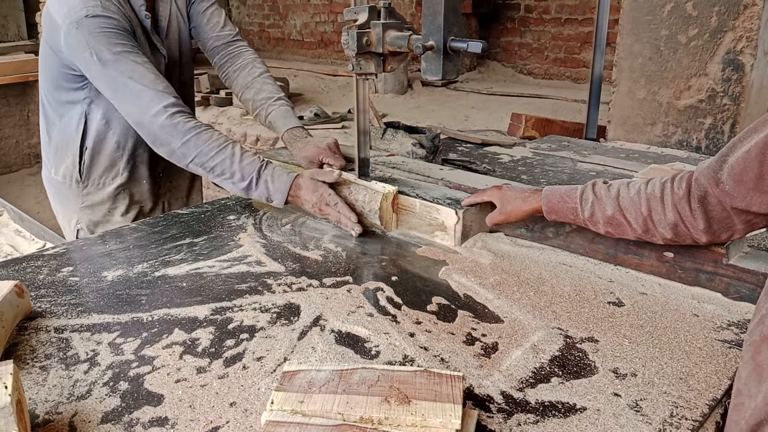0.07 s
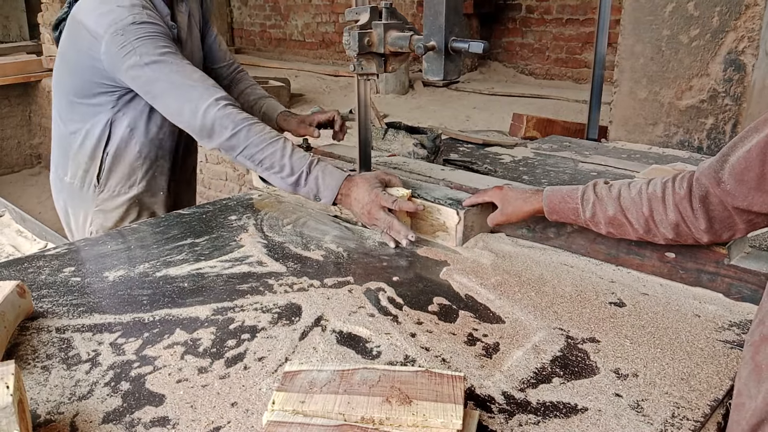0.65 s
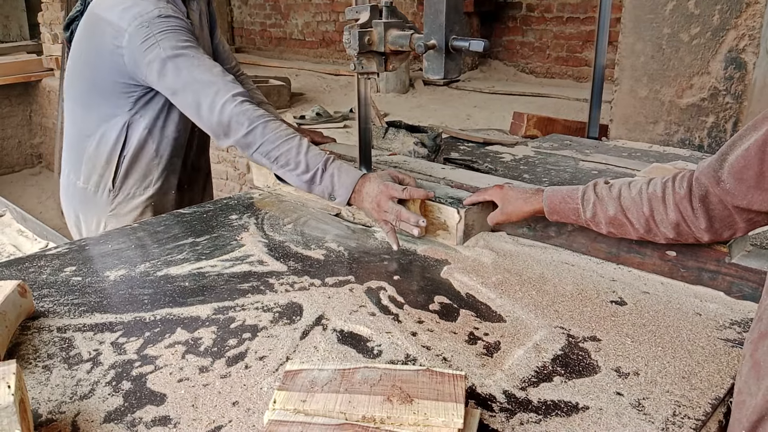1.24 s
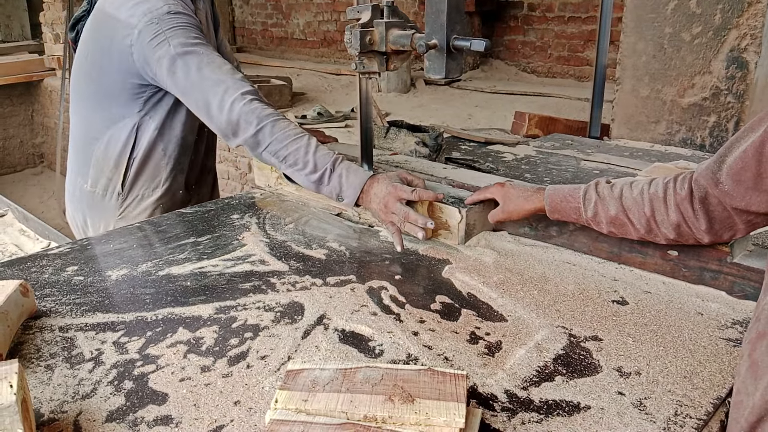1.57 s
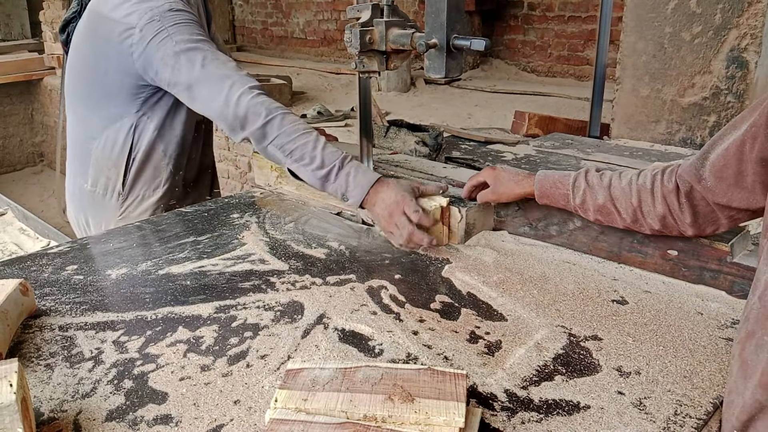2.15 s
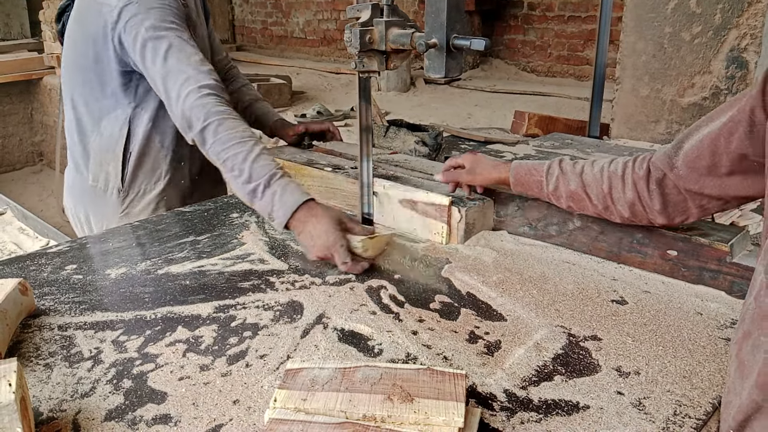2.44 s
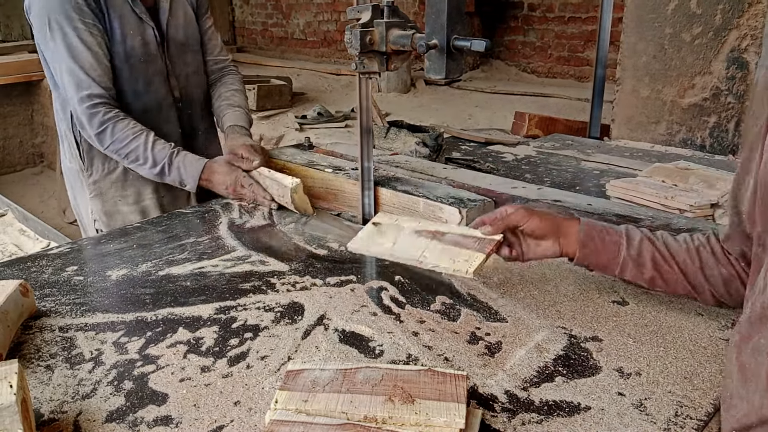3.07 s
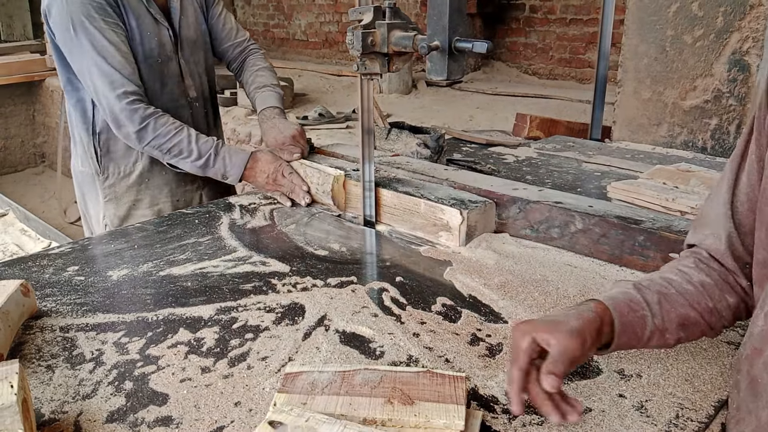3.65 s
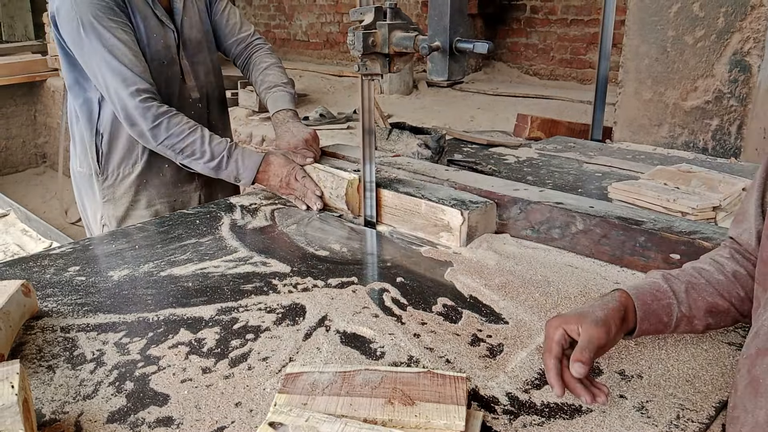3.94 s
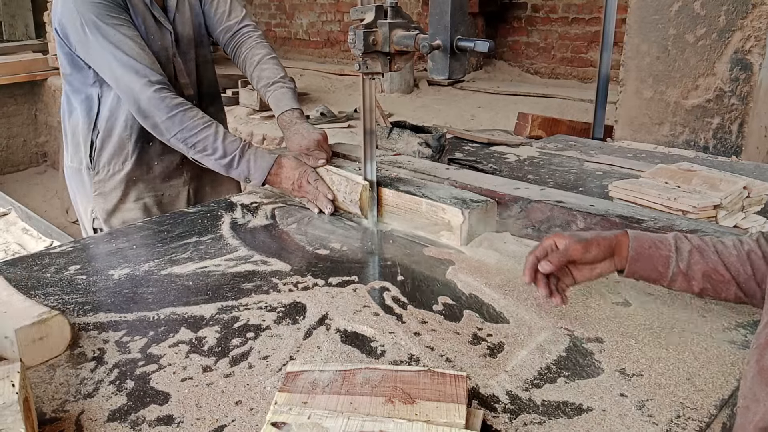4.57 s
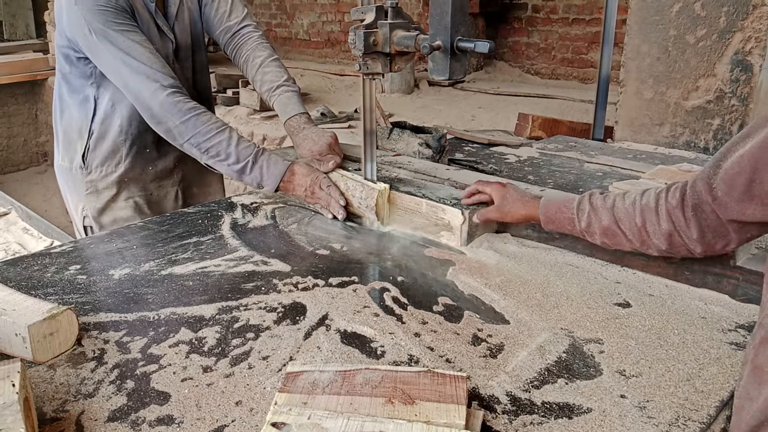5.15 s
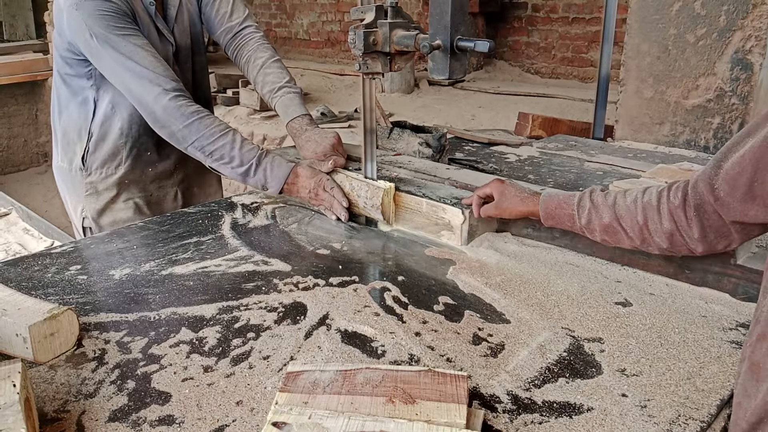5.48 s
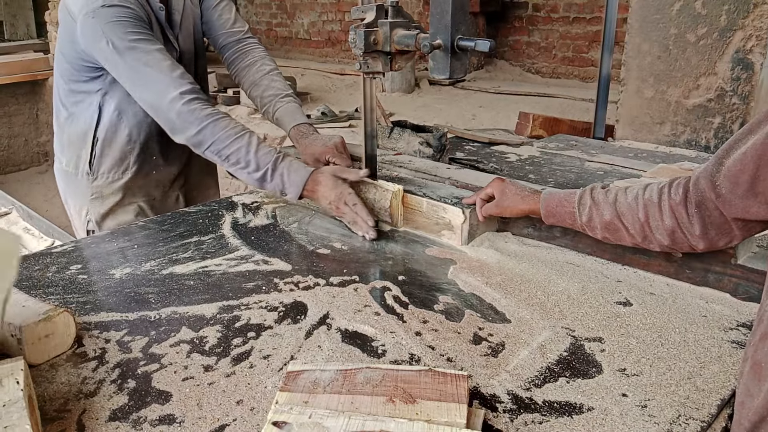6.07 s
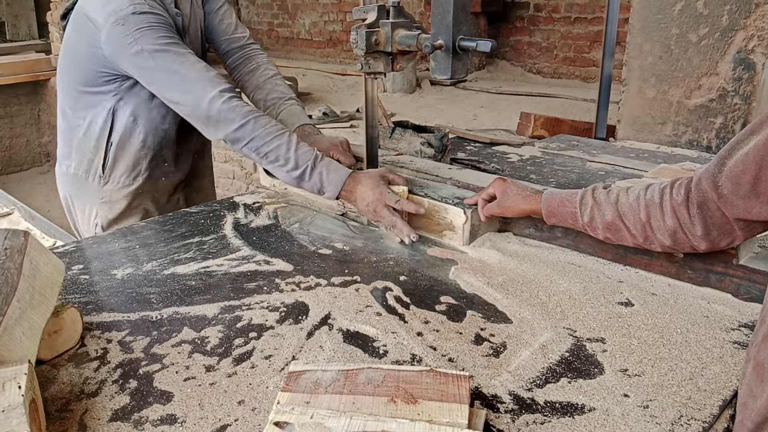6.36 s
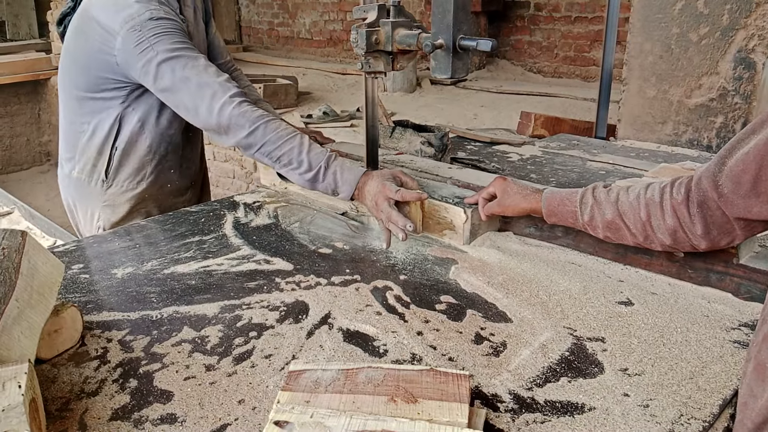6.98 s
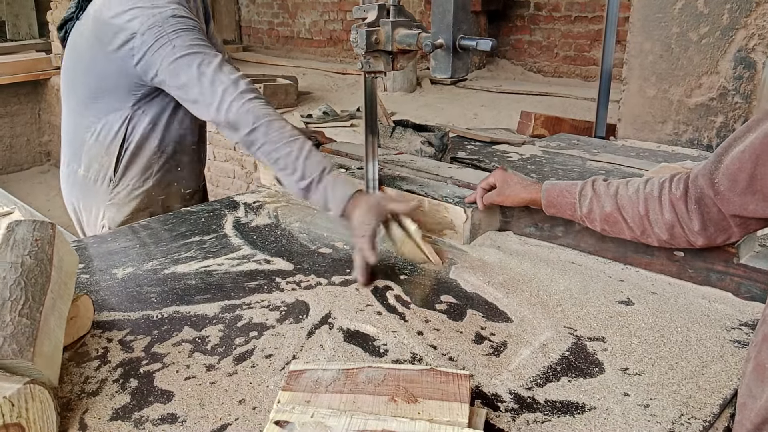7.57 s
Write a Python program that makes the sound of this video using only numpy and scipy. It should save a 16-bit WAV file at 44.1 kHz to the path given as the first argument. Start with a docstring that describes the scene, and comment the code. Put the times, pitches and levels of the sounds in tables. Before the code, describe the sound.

In a workshop, a running band saw rasps through small wood blocks, its high wavering whistle joined by cracks and knocks.

```python
"""A workshop, heard in mono, where a large band saw slices wooden blocks. The steel band rubs in its guides
with a wavering whistle and squeals where the wood pinches it; a wheel creaks once. Its teeth rasp and hiss as
the wood is pushed in, and the last fibres crack as the slat comes free. Blocks scrape and knock on the table,
and a sawn slat drops on a pile. Underneath, the frame drones, the table rumbles and a low hum climbs; brick
walls add a short reverb."""
import sys
import numpy as np
from scipy import signal
from scipy.fft import rfft, irfft, next_fast_len
from scipy.io import wavfile
from scipy.ndimage import uniform_filter1d, minimum_filter1d, map_coordinates

SR = 44100
rng = np.random.default_rng(int(sys.argv[2]) if len(sys.argv) > 2 else 0)


def master(y):
    """Save y as 16-bit WAV."""
    cut = np.clip(np.atleast_2d(y).T, -1, 1)
    pcm = np.round(cut * 32767)  # scale
    wavfile.write(sys.argv[1], SR, pcm.astype(np.int16))


N = 344862

# woody colour of a block's buzz and clack: f/Hz, level/dB
BLOCK_SPECTRUM = [(300, -31), (600, -10.5), (1150, -3.5), (1450, -6.5), (1800, 3), (2250, 1), (2700, -1.5),
                  (4000, -9.5), (9000, -41)]


def band(load, whistle_gain, grip_ring):
    """The guides rub the steel band; out-of-round wheels vary its tension, so its resonances waver."""
    # resonances of the band: f/Hz, half width/Hz, level/dB
    modes = [(2978, 47, -9.5), (3110, 54, -12.5), (3250, 130, -2.5), (3400, 70, -5), (3480, 68, -4),
             (3650, 100, -7), (3715, 71, -7.5), (3973, 147, -8), (4370, 60, -10.5), (4710, 220, -11),
             (5100, 14, -4.5), (5200, 90, -9.5), (5450, 94, -10.5), (5800, 190, -10.5), (5720, 161, -10.5),
             (6000, 51, -2), (6220, 130, -8), (6380, 190, -15), (7840, 180, -22.5)]
    wheel_hz, whistle_hz, free_whistle_db = 4.41, 3038, -29
    wheel = 2 * np.pi * wheel_hz * np.arange(N) / SR
    runout = .002 * np.sin(wheel) + .0065 * np.sin(2 * wheel)
    bend = runout + .005 * wobble(30)

    def waver(x, depth):
        return map_coordinates(x, [np.arange(N) + depth * np.cumsum(bend)], mode="wrap")

    # the lowest resonances half sing, half hiss
    phase = running_phase(whistle_hz * (1 + bend))
    tone = unit(amp(3.5 * wobble(60)) * np.sin(phase + .7 * wobble(80)))
    whistle = 0.78 * tone + 0.65 * waver(resonant(noise(), modes[:2]), depth=1)
    upper = waver(resonant(noise(), modes[2:]), depth=0.7016)
    whistle *= np.hypot(amp(free_whistle_db), whistle_gain) * amp(0.89 * wobble(18))
    upper_gain = np.hypot(loaded(load, free_db=-24, cut_db=-33, growth=0.95), grip_ring)
    return whistle + upper * upper_gain * amp(0.99 * wobble(25))


def teeth(load, buzz_gain, crackle_gain, grip_note, grip_hiss):
    """Each tooth tears off a chip: pulsing rasp, top hiss, block buzz, fibre crackle and a thin note."""
    # colours of the rasp, the top hiss and the snapping fibres: f/Hz, level/dB
    rasp_spectrum = [(600, -33), (1500, -16.5), (2700, -9.5), (3300, -4.5), (4200, -1.5), (5300, -3),
                     (6200, 4), (6900, -2.5), (7400, -10), (8000, -9), (9300, -22), (11000, -17.5),
                     (16000, -12)]
    hiss_spectrum = [(7000, -14.5), (9500, -20), (11300, -8.5), (12300, -20), (13300, 2.5), (14000, 8),
                     (15000, 0), (15700, -8.5)]
    fibre_spectrum = [(300, -32), (1500, -4), (2400, -4), (4500, -4), (6500, 8.5), (7400, -2.5),
                      (9300, -34), (14000, -20), (16000, -30)]
    # harmonics of the tooth rate: multiple, level/dB
    harmonics = [(1, -24), (4, 11.5), (8, -12), (9, 2), (10, -6), (11, -15), (12, -17), (16, -23)]
    tooth_hz, hardness_spread_db = 629.8, 1.0
    phase = running_phase(tooth_hz * (1 + 0.0012 * wobble(12)))
    # the teeth bite unevenly into the grain
    bite = unit((1 + 0.25 * np.cos(phase)) * amp(0.98 * wobble(400) + 0.47 * wobble(18)))
    grain_load = load * amp(hardness_spread_db * wobble(16))
    rasp_gain = loaded(grain_load, free_db=-27.5, cut_db=-26.5, growth=0.6)
    rasp = rasp_gain * coloured(bite * noise(), rasp_spectrum)
    hiss_gain = np.hypot(loaded(load, free_db=-41.5, cut_db=-35, growth=0.5), grip_hiss)
    hiss = hiss_gain * amp(1.2 * wobble(24)) * coloured(bite * noise(), hiss_spectrum)
    free_buzz, cut_buzz = amp(-33.5), buzz_gain * amp(hardness_spread_db * wobble(16))
    buzz = np.hypot(free_buzz, cut_buzz) * coloured(bite * noise(), BLOCK_SPECTRUM)
    snaps = uniform_filter1d(np.abs(grains(rate=150, spread_db=3.5)), size=44)
    crackle = crackle_gain * coloured(noise() * snaps, fibre_spectrum)
    note = sum(amp(db + 3.2 * wobble(45)) * np.sin(k * phase + 0.8 * wobble(55)) for k, db in harmonics)
    note_gain = np.hypot(loaded(load, free_db=-67, cut_db=-54.5, growth=1), grip_note)
    return rasp + hiss + buzz + crackle + note_gain * note


def feed():
    """Hands push wood into the teeth: the load, and gains for buzz, crackle, rumble and whistle."""
    # pushes: t/s, length/s, load/dB, load change by the end/dB,
    # then at unit load: buzz/dB, crackle/dB, rumble/dB, whistle/dB
    pushes = [(-0.1, 2.19, -1.5, -3.5, -30, -22.5, -35.5, -28.5),
              (4.14, 1.3, 2.5, -1, -38, -52, -39.5, -30), (5.69, 1.78, -2, 12, -36, -41.5, -39.5, -30),
              (7.65, 0.11, -3, -2, -33, -45, -41, -31)]
    enter_s, clear_s = 0.094, 0.045
    t = np.arange(N) / SR
    load, buzz, crackle, rumble, whistle = np.zeros((5, N))
    unsteady_db = .5 * wobble(6)
    for start, length, load_db, change_db, buzz_db, crackle_db, rumble_db, whistle_db in pushes:
        contact = np.clip((t - start) / enter_s, 0, 1) * np.clip(1 - (t - start - length) / clear_s, 0, 1)
        progress = np.clip((t - start) / length, 0, 1)
        push = contact * amp(load_db + unsteady_db + change_db * progress ** 3)  # changes mostly late
        load += push
        buzz += amp(buzz_db) * push ** 0.91
        crackle += amp(crackle_db) * push ** 2.26
        rumble += amp(rumble_db) * push
        whistle += amp(whistle_db) * push ** .7
    return load, buzz, crackle, rumble, whistle


def kerf_grip():
    """The kerf grips the band: swelling gains for the tooth note, the top hiss and the band's ring."""
    # grips: t/s, length/s, note/dB, hiss/dB, ring/dB
    grips = [(1.35, 0.72, -46.5, -51, -30), (4.15, 0.91, -42.5, -25, -25)]
    note, hiss, ringing = np.zeros((3, N))
    for start, length, note_db, hiss_db, ring_db in grips:
        shape = swell(length)
        add(note, start, amp(note_db) * np.minimum(1, 2 * shape ** 8))
        add(hiss, start, amp(hiss_db) * shape)
        add(ringing, start, amp(ring_db) * shape)
    return note, hiss, ringing


def squeals():
    """The band squeals briefly where the wood pinches it, and a wheel creaks shortly after 2 s."""
    # squeals and a creak: t/s, length/s, f/Hz, half width/Hz, level/dB
    squeaks = [(0.919, .13, 3103, 11, -24), (.85, 0.56, 1300, 110, -37), (2.08, 0.22, 2200, 170, -33),
               (7.13, 0.33, 5650, 14, -28.5), (7.258, 0.18, 5870, 330, -27)]
    out = np.zeros(N)
    for start, length, hz, width, db in squeaks:
        shape = swell(length)
        add(out, start, amp(db) * shape * resonant(noise(len(shape)), [(hz, width, 0)]))
    return out


def splinters():
    """The last fibres give with short dry cracks as the teeth break out of the block."""
    # cracks: t/s, f/Hz, level/dB
    cracks = [(1.768, 2300, -18), (1.787, 2260, -17), (2.022, 2300, -19.5), (7.408, 2550, -14),
              (7.428, 2400, -11), (7.443, 4200, -17), (7.468, 1400, -17)]
    half_width_hz, t60_s = 330, 0.028
    out, t = np.zeros(N), np.arange(SR // 8) / SR
    for start, hz, db in cracks:
        crack = resonant(noise(len(t)), [(hz, half_width_hz, 0)])
        add(out, start, amp(db - 60 * t / t60_s) * crack)
    return out


def knocks():
    """Wood strikes the table with a low thud and a clack, and bumps against the fence."""
    # blows on the table: t/s, level/dB, relative thud/dB, relative clack/dB
    blows = [(0.331, -11.5, -25, -18), (4.459, -2.5, 2, -17), (4.469, -6, -1, -20), (4.482, -6.5, 1, -14),
             (4.495, -6, -17, -15), (4.506, -23, -11, -22), (4.577, -14.5, -13, -2), (5.658, -13, -7, -12),
             (5.672, -11, -13, -5), (5.724, -16.5, 0, -2), (5.951, -25, 8.5, -19), (7.467, -24, -8, 6),
             (7.756, -15.5, -11, -12)]
    # bumps on the fence: t/s, level/dB
    bumps = [(5.991, -11), (6.206, -11)]
    # ring of a blow and of a bumped block: f/Hz, level/dB, t60/s
    blow_modes = [(148.4, -3.5, 0.16), (233.6, 0, 0.11), (260, -10, 0.086), (399, -3.5, 0.066),
                  (540, 0, 0.072), (740, 1.5, 0.056), (940, 2.5, 0.046), (1082, -1.5, 0.05),
                  (1346, 1, 0.026)]
    bump_modes = [(217, 3.5, 0.038), (453, -16, 0.029), (835, -6, 0.034)]
    out = np.zeros(N)
    for start, db, thud_db, clack_db in blows:
        attack = clack(clack_db - 3.5, t60_s=0.026)
        body = amp(-10) * ring(blow_modes, thud_db + 4)
        add(out, start, amp(db) * (attack + body))
    for start, db in bumps:
        add(out, start, amp(db) * ring(bump_modes))
    return out


def slat_drop():
    """The sawn slat lands and bounces on the pile with a dry, ringing clack."""
    # landings: t/s, level/dB
    landings = [(3.636, -15.5), (3.641, -13.5), (3.651, -29)]
    # ring of the slat: f/Hz, level/dB, t60/s
    modes = [(830, -12, .045), (1000, -12, .04), (1430, -3, 0.023), (2070, 1, 0.03), (2450, -1, .022)]
    out = np.zeros(N)
    for start, db in landings:
        add(out, start, amp(db) * (clack(-3.5, t60_s=0.036) + ring(modes)))
    return out


def clack(db, t60_s):
    """The attack of struck wood: a fast-fading burst of woody noise."""
    t = np.arange(SR // 4) / SR
    return coloured(noise(len(t)), BLOCK_SPECTRUM) * amp(db - 60 * t / t60_s)


def ring(modes, thud_db=0):
    """Fading modes of struck wood, a little different each blow; thud_db weights those under 300 Hz."""
    t = np.arange(SR // 4) / SR
    tones = np.zeros(len(t))
    for hz, db, t60 in modes:
        decay = amp(db + thud_db * (hz < 300) + rng.normal(0, 1) - 60 * t / t60)
        tones += decay * np.sin(2 * np.pi * hz * (1 + rng.normal(0, 0.024)) * t)
    return tones * (1 - np.exp(-t / 0.0029))


def slides():
    """Blocks judder on the table and scrape over its sawdust."""
    # strokes: t/s, length/s, judder/dB, scrape/dB
    strokes = [(0.173, 0.23, -35.5, -31), (0.482, 0.26, -33.5, -34.5), (0.77, 0.29, -37.5, -36),
               (1.377, 0.31, -36.5, -39), (2.68, 0.454, -42, -46), (3.17, .36, -45, -50),
               (4.225, .17, -39, -50), (5.656, 0.17, -31.5, -35), (5.9, 0.17, -38, -35),
               (6.233, .13, -37, -61), (6.62, .5, -40, -41.5), (7.304, 0.24, -37, -40.5)]
    # colours of the judder and the scrape: f/Hz, level/dB
    judder_spectrum = [(50, -36), (95, -7), (135, 7.5), (180, 3), (230, 11), (320, -35), (900, -39),
                       (3000, -60)]
    scrape_spectrum = [(150, -49), (330, -1.5), (450, 4.5), (620, 0.5), (730, -8), (870, 1), (1150, -15),
                       (1600, -17), (5000, -42)]
    judder, scrape = np.zeros((2, N))
    for start, length, judder_db, scrape_db in strokes:
        shape = signal.windows.tukey(int(length * SR), .5)
        add(judder, start, amp(judder_db) * shape)
        add(scrape, start, amp(scrape_db) * shape)
    slips = grains(rate=700, spread_db=4)
    return judder * coloured(slips, judder_spectrum) + scrape * coloured(slips, scrape_spectrum)


def machine(rumble_gain):
    """The frame drones and the table rumbles, harder when the cut shakes it."""
    # resonances of frame and table: f/Hz, half width/Hz, level/dB
    frame_modes = [(167.4, 38, 0), (247, 73, -5), (483, 50, -6.5), (608, 75, -3), (651, 24, -20),
                   (707, 26, -6), (829, 36, 2), (897, 22, 4.5), (982, 52, -0.5), (1230, 110, -6.5),
                   (1380, 74, -9), (1900, 150, -9.5)]
    table_modes = [(148, 21, -7), (229.4, 28, 4.5), (440, 69, -1.5), (542, 72, -4), (878, 75, -2)]
    drone = amp(-36.5) * resonant(noise(), frame_modes)
    shake = np.hypot(amp(-43.5), rumble_gain) * amp(2.45 * wobble(12))
    return drone + shake * resonant(noise(), table_modes)


def hum():
    """A low hum climbs in pitch, then drops away."""
    # path of the hum: t/s, f/Hz, level/dB
    glide = [(0, 77, -52.5), (1.2, 78.8, -51.5), (2, 84.7, -46.5), (3.83, 94, -46.5), (3.92, 95, -81)]
    times, pitches, levels = np.transpose(glide)
    t = np.arange(N) / SR
    gain = amp(np.interp(t, times, levels) - 2 + 2 * wobble(15))
    phase = running_phase(np.interp(t, times, pitches))
    return gain * unit(np.sin(phase + .4 * wobble(30)))


def workshop(x):
    """Dusty brick walls answer briefly, with little bass, the treble dying first."""
    # reverb time: f/Hz, t60/s
    decay_times = [(150, 0.19), (2000, 0.12), (14000, 0.049)]
    hz, t, spectrum = signal.stft(noise(SR // 3), SR, nperseg=256)
    t60 = np.interp(hz, *np.transpose(decay_times))[:, None]
    tail = signal.istft(spectrum * amp(-60 * t / t60), SR, nperseg=256)[1]
    wet = signal.fftconvolve(x, tail / np.linalg.norm(tail))[:N]
    return filtered(wet, lambda f: f / (f + 600))


def loaded(load, free_db, cut_db, growth):
    """Gain of a layer: its free-running part plus a cutting part rising growth dB per dB of load."""
    return np.hypot(amp(free_db), amp(cut_db) * load ** growth)


def amp(db):
    return 10 ** (np.asarray(db) / 20)


def unit(x):
    return x / np.sqrt(np.mean(x ** 2) + 1e-20)


def noise(length=N):
    return rng.standard_normal(length)


def running_phase(hz):
    return 2 * np.pi * np.cumsum(hz) / SR


def swell(length_s):
    return signal.windows.hann(int(length_s * SR)) ** .5


def wobble(rate):
    """A smooth random curve, rate knots a second."""
    return map_coordinates(noise(int(N * rate / SR) + 4), [np.arange(N) * rate / SR])


def grains(rate, spread_db):
    """Tiny random impacts of uneven size, rate a second."""
    return (rng.random(N) < rate / SR) * np.sign(noise()) * amp(spread_db * np.clip(noise(), -2, 2))


def filtered(x, response):
    """x through a gain given as a function of frequency."""
    size = next_fast_len(len(x) + SR // 4)
    return irfft(rfft(x, size) * response(np.fft.rfftfreq(size, 1 / SR)), size)[:len(x)]


def coloured(x, points):
    """x through an EQ curve of (f/Hz, level/dB) points, at rms 1."""
    hz, db = np.transpose(points)
    return unit(filtered(x, lambda f: amp(np.interp(np.log(f + 1), np.log(hz), db))))


def resonant(x, modes):
    """x through steep-sided resonances, at rms 1."""
    def response(f):
        return np.sqrt(sum(amp(db) ** 2 / (1 + ((f - hz) / width) ** 2) ** 2 for hz, width, db in modes))
    return unit(filtered(x, response))


def add(track, start_s, sound):
    part = track[round(start_s * SR):][:len(sound)]
    part += sound[:len(part)]


def scene():
    """The push of the wood drives the saw; handling noises and the workshop's reverb join it."""
    load, buzz_gain, crackle_gain, rumble_gain, whistle_gain = feed()
    grip_note, grip_hiss, grip_ring = kerf_grip()
    blade = band(load, whistle_gain, grip_ring)
    blade += teeth(load, buzz_gain, crackle_gain, grip_note, grip_hiss) + squeals()
    bed = machine(rumble_gain) + hum()
    wood = splinters() + slides() + knocks() + slat_drop()
    direct = blade + bed + wood
    return direct + amp(-12.5) * workshop(direct)


def record(dry):
    """A fast limiter holds the peaks, deep bass and the top are cut; one signal feeds both channels."""
    ceiling, low_cut_hz, top_hz = .52, 55, 15780
    needed_gain = np.minimum(1, ceiling / (np.abs(dry) + 1e-9))
    limited = dry * uniform_filter1d(minimum_filter1d(needed_gain, size=89), size=89)
    mono = filtered(limited, lambda f: f ** 3 / np.sqrt(f ** 6 + low_cut_hz ** 6) * (f < top_hz))
    return np.tile(mono, (2, 1))


dry = scene()
out = record(dry)
master(out)
```